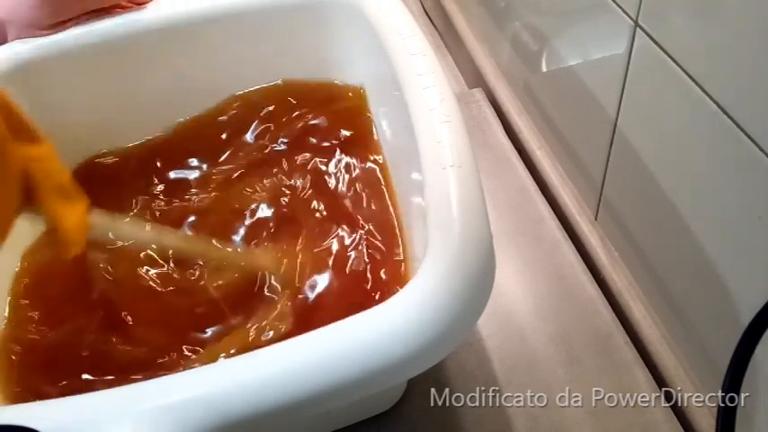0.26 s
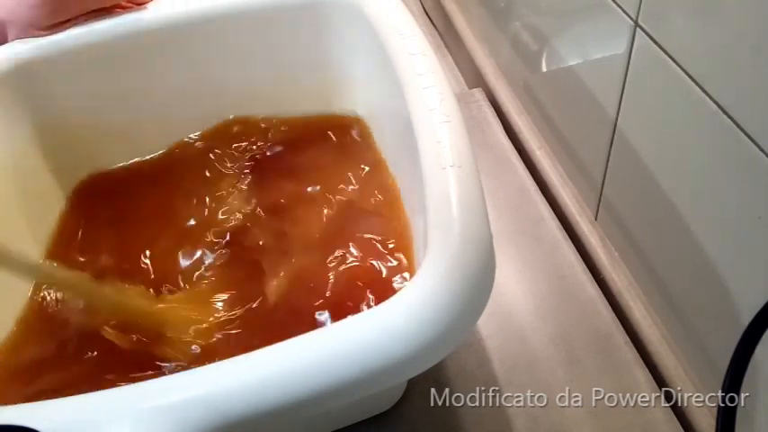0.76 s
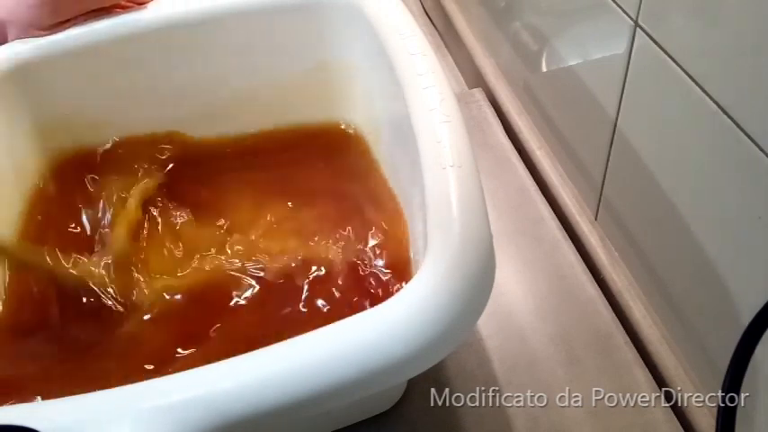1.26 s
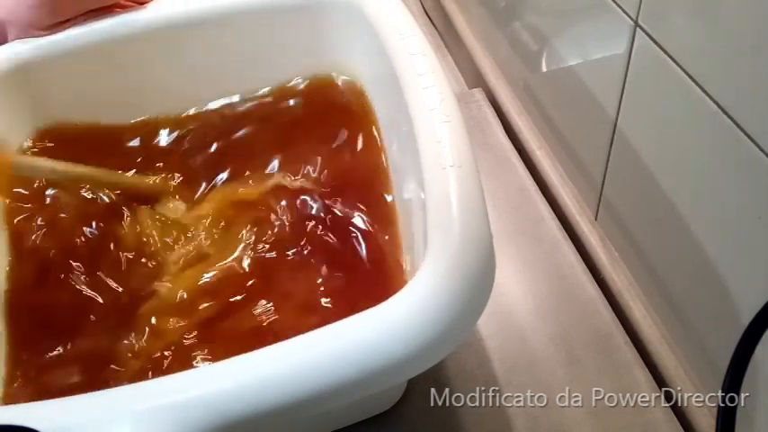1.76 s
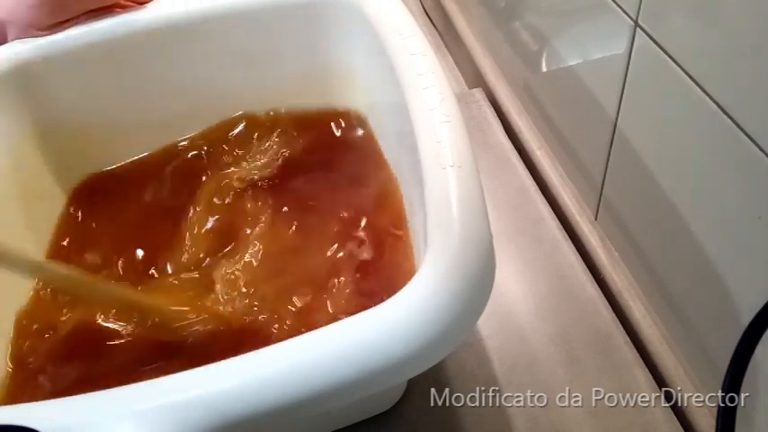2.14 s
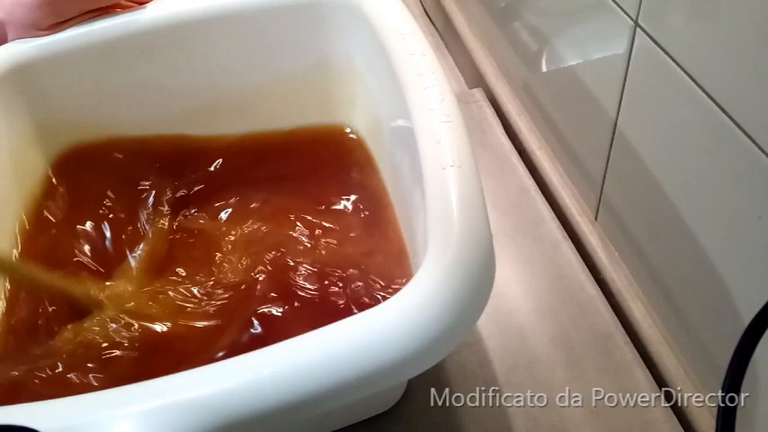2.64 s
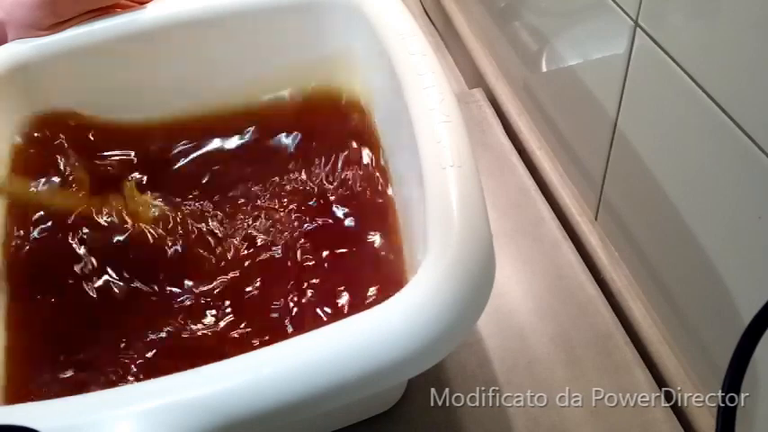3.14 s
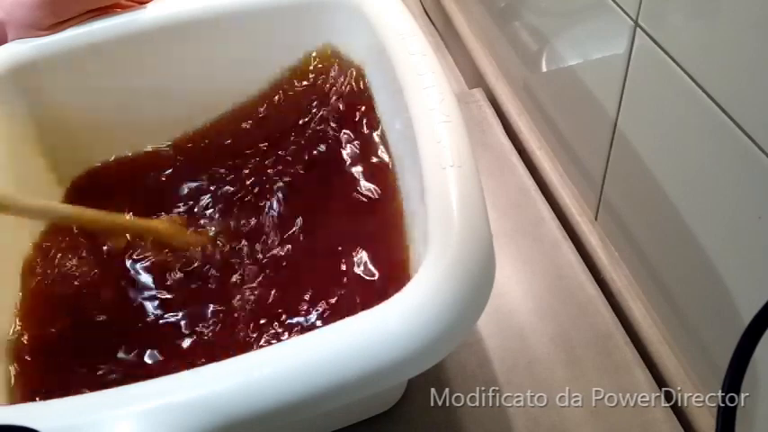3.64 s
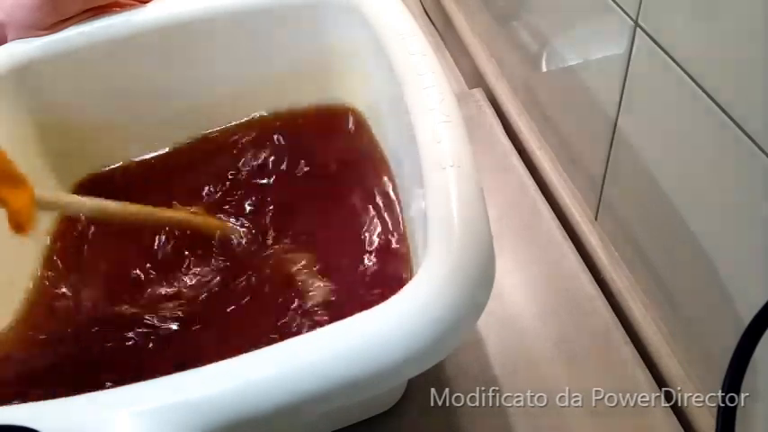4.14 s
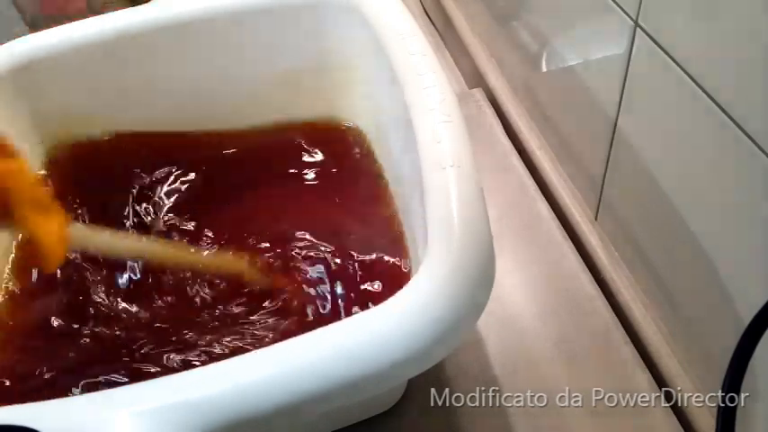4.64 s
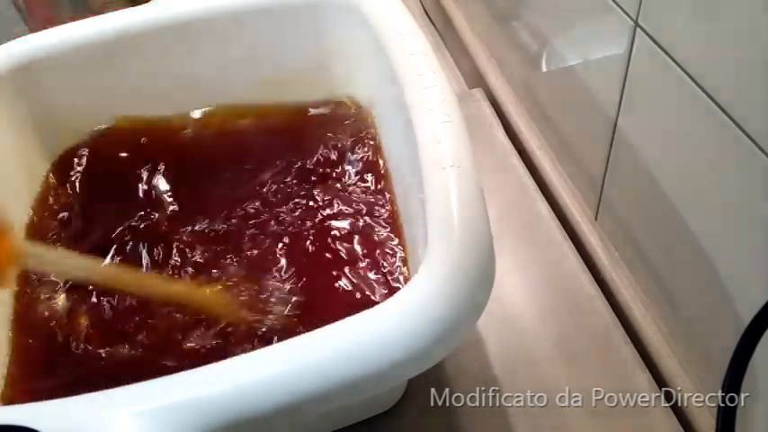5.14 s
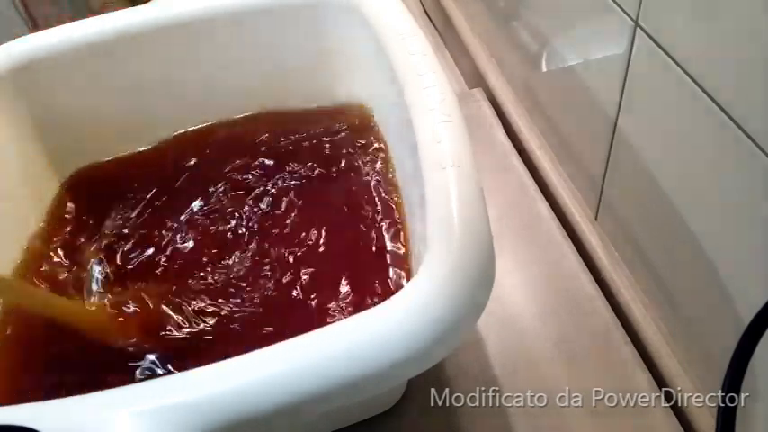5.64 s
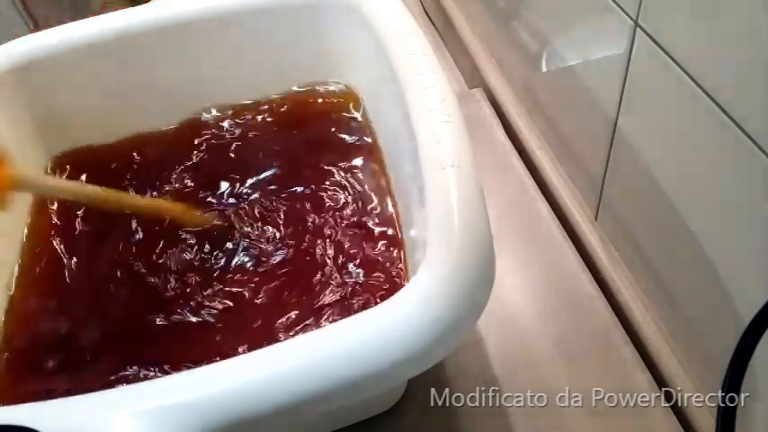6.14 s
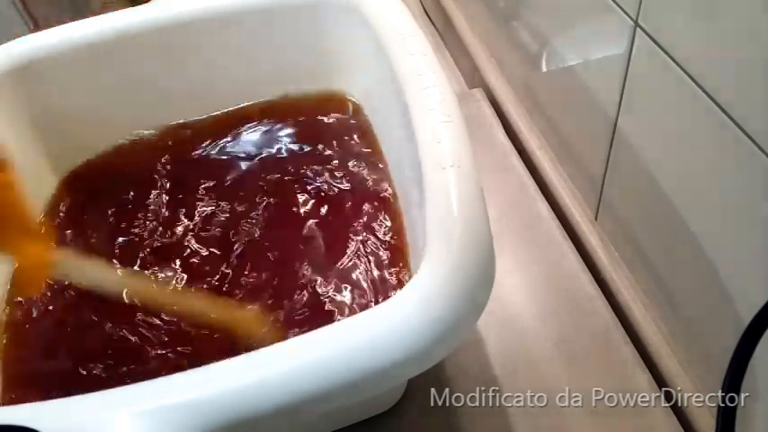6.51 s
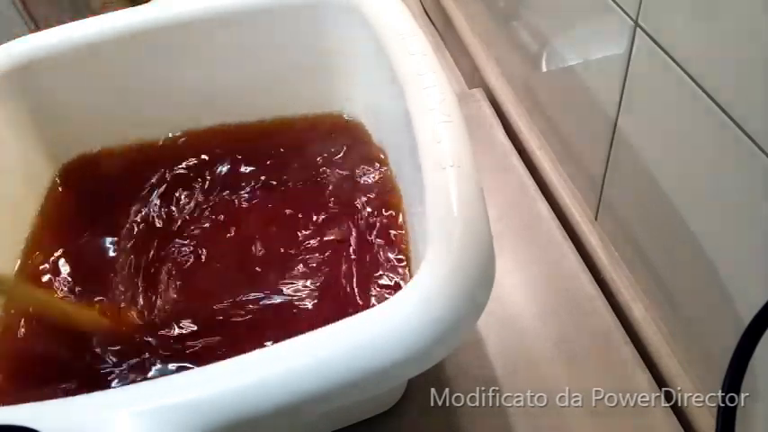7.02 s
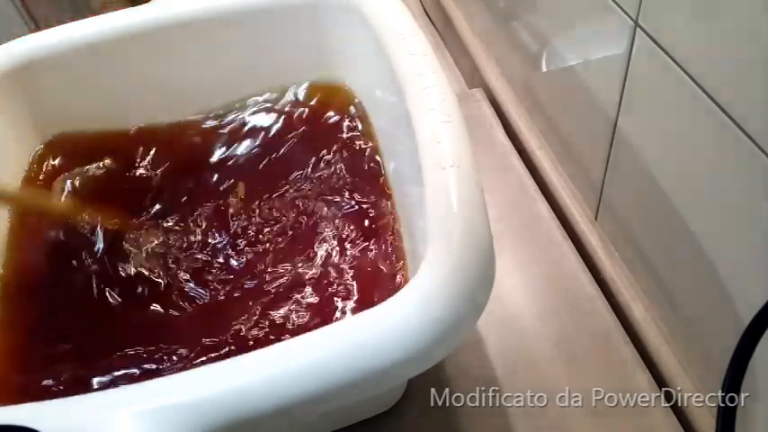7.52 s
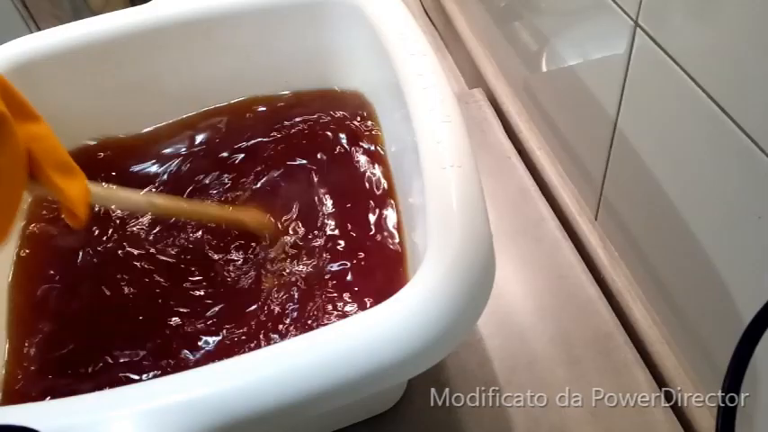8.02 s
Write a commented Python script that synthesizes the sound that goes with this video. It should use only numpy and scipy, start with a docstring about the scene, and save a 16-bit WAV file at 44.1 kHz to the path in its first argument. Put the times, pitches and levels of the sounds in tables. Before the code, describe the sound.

Close, wet stirring in a plastic tub: bubbling swirls, bright droplet ticks and fizzing froth pulse continuously with a short hollow room echo.

```python
"""A wooden spoon stirs thin liquid soap round a plastic basin in a small tiled room.
Each stroke folds air under: trapped bubbles ring as resonators, many gliding upward near the surface.
Swarms of smaller bubbles make gurgle, fizz and froth; crests and sheets spatter as filtered noise.
Liquid heaves and hums in the basin; drifting echoes and a decaying tail give basin and room."""
import sys
import numpy as np
from scipy import signal
from scipy.fft import rfft, irfft
from scipy.io import wavfile
from scipy.ndimage import map_coordinates

SR = 44100
rng = np.random.default_rng(int(sys.argv[2]) if len(sys.argv) > 2 else 0)


def file_out(sig):
    """Save sig as 16-bit WAV at sys.argv[1]."""
    # one column per channel
    cols = np.atleast_2d(sig).T
    # limit, then scale
    lim = np.clip(cols, -1, 1)
    pcm = np.round(lim * 32767).astype(np.int16)
    wavfile.write(sys.argv[1], SR, pcm)


N = 364266  # length [samples]

# Spectrum of froth and bursting films: (frequency [Hz], filter gain [dB])
FROTH_SPECTRUM = [(200, -61), (900, -42), (2200, -4), (3800, 6.5), (6000, 3), (9000, -3), (15000, -4)]
# Spectrum of the churning wake: (frequency [Hz], filter gain [dB])
GURGLE_SPECTRUM = [(90, -13), (300, -20.5), (450, -10), (750, -3.5), (1000, 1.5), (1350, 6.5), (2500, 3.5),
                   (4000, -4.5), (6000, -4.5)]
# Air resonances of the basin: (frequency [Hz], width [Hz], relative gain [dB])
BASIN_MODES = [(447, 35, 3), (508, 36, 14.5), (597, 130, -10.5), (1340, 71, 1), (1850, 49, 0),
               (2530, 180, -14.5)]
# Growth of each wavelet: (build rate [dB/s], level between wavelets [dB])
GURGLE_GROWTH = (330, -72)
FROTH_GROWTH = (330, -86)
PLIP_CYCLES = 10  # life of a steady bubble, in cycles of its pitch


def gain_of(db):
    """Amplitude ratio: 20 dB is a factor of ten."""
    return 10 ** (np.asarray(db) / 20)


def evened(x):
    """Normalization: scales a signal to an rms of one."""
    return x / np.sqrt(np.mean(x ** 2) + 1e-20)


def read_spectrum(points, hz):
    """Linear interpolation on a logarithmic frequency axis."""
    f, value = np.transpose(points)
    return np.interp(np.log(hz + 1), np.log(f), value)


def add(mix, s, sound):
    """Superposition: adds a sound to the mix from time s [s]."""
    part = mix[max(round(s * SR), 0):][:len(sound)]
    part += sound[:len(part)]


def colour(x, points, tilt_db=0, size=2048):
    """Minimum-phase filtering: phase follows from log gain, so clicks keep their sharp front."""
    hz = np.fft.rfftfreq(size, 1 / SR)
    gain_db = read_spectrum(points, hz) + tilt_db * np.log2(hz + 1000)
    log_gain = np.log(gain_of(gain_db))
    both_sides = np.r_[log_gain, log_gain[-2:0:-1]]
    response = np.exp(signal.hilbert(both_sides).conj())
    return signal.oaconvolve(x, np.fft.ifft(response).real)[:len(x)]


def waver(length, hz):
    """Band-limited random motion: splined noise of about unit size, changing about hz times a second."""
    at = np.arange(length) * hz / SR
    return map_coordinates(rng.standard_normal(int(at[-1]) + 4), [at + 1], order=3)


def impacts(per_s, spread_db, cap=10.95):
    """Random impulse train: independent arrivals whose sizes in dB are exponentially spread."""
    size = gain_of(spread_db * np.minimum(rng.exponential(1, N), cap))
    return size * rng.choice([-1, 1], N) * (rng.random(N) < per_s / SR)


def bubble(hz, life, rise, onset=0.05, wobble=0, wobble_hz=1):
    """Bubble resonance: trapped air rings, its pitch climbing as the liquid above it thins."""
    t = np.arange(0, 2 * life, 1 / SR)
    # a squeezed bubble rings unevenly, in level and in pitch
    shape, bend = [wobble * waver(len(t), wobble_hz) if wobble else 0 for _ in range(2)]
    octaves = rise * np.minimum(t, 1.2 * life) + bend / 10
    phase = 2 * np.pi * np.cumsum(hz * 2 ** octaves) / SR
    build = 1 - np.exp(-t / (onset * life))
    # slow decay, then a quick end as the bubble bursts
    decay = np.exp(-t / life / 2 - (t / life / 1.2) ** 4)
    return build * decay * (1 + shape) * np.sin(phase)


def stirring(order, growth):
    """Energy summation: wavelets build and settle exponentially, and their powers add."""
    # Wavelets raised by the spoon and thrown back by the walls:
    # (time of crest [s], gurgle drive [dB], froth drive [dB])
    wavelets = np.array([(0.035, -43, -51), (0.24, -54, -58), (0.41, -54, -56), (0.59, -54, -51),
                         (0.77, -53, -56), (1.12, -50, -51), (1.261, -45.5, -59), (1.38, -48, -47),
                         (1.56, -49, -53), (1.73, -52, -49), (1.89, -49, -53), (2.14, -51, -55),
                         (2.36, -58, -58.5), (2.68, -47, -54), (3.08, -57, -57), (3.22, -50, -56),
                         (3.29, -51, -56), (3.49, -52, -60), (3.61, -50, -48), (3.78, -45, -48),
                         (3.94, -52, -55), (4.26, -48, -47), (4.38, -43, -45), (4.55, -48, -48),
                         (4.68, -47, -53), (4.82, -50, -45), (5.0, -44.5, -51), (5.11, -43, -44),
                         (5.38, -49, -51), (5.58, -47, -52), (5.7, -45, -53), (5.86, -52, -57.5),
                         (6.34, -49, -59), (6.47, -51, -57), (6.72, -59, -60), (6.92, -44, -49),
                         (7.15, -48, -55), (7.36, -51, -49), (7.61, -45, -50), (7.72, -51, -56),
                         (8.09, -56, -52), (8.19, -51, -52)])
    build, calm_db = growth
    settle_s = 0.26  # time to settle by 20 dB
    t = np.arange(0, N, 64) / SR
    age = t[:, None] - wavelets[:, 0]
    level_db = wavelets[:, order] + np.minimum(build * age, -20 * age / settle_s)
    power = (gain_of(level_db) ** 2).sum(1) + gain_of(calm_db) ** 2
    return np.interp(np.arange(N) / SR, t, np.sqrt(power))


def swarm(drive, low_hz, high_hz, cycles, per_s, octaves, spread_db=7.5):
    """Random superposition of bubble resonances: harder stirring makes them more frequent and louder."""
    crowd = (drive / drive.mean()) ** .8
    births = np.flatnonzero(rng.random(N) < crowd * per_s / SR)
    out = np.zeros(N)
    for at, (pitch, length, glide, size) in zip(births, rng.random((len(births), 4))):
        hz = low_hz * (high_hz / low_hz) ** pitch
        life = cycles / hz * (.5 + length)
        ring = bubble(hz, life, octaves * glide ** 2 / life)
        size_db = spread_db * min(-np.log(1 - size), 3)
        balance = np.sqrt(hz / len(ring) / crowd[at])
        add(out, at / SR, gain_of(size_db) * ring * balance * drive[at])
    return out / np.sqrt(np.mean((out / drive) ** 2))


def plops(db=-0.36, snap_db=-15.5, snap_share=0.17, film_db=-24.0, shed_db=-13.5, shed_octaves=0.916):
    """Bubble resonance of larger bubbles: each snaps as its neck closes and sheds three weaker ones."""
    # Bubbles that glide upward as they near the surface:
    # (time [s], relative level [dB], starting pitch [Hz], rise [octaves/s], life [s])
    gliding = [(0.03, -26, 1116, 7.9, 0.0055), (0.186, -30, 958, 45, 0.015),
               (0.196, -26.5, 1337, 59, 0.012), (0.428, -26.5, 2630, 81, 0.0038),
               (0.491, -18.5, 2130, 62, 0.0068), (0.727, -30, 1145, 21.3, 0.0112),
               (1.092, -29, 2920, 27, 0.0036), (1.225, -38.5, 400, 13, 0.023),
               (1.25, -32.5, 454, 33, 0.023), (1.369, -28.5, 587, 28.5, 0.022),
               (1.514, -24.5, 1361, 19, 0.0045), (1.52, -32, 1570, 77, 0.013),
               (1.556, -26, 3380, 24, 0.0058), (2.159, -32, 1383, 16, 0.011), (2.168, -31, 1645, 46, 0.012),
               (2.605, -42, 440, 13.4, 0.021), (2.751, -31.5, 2000, 30, 0.0092),
               (3.206, -44, 455, 15.5, 0.018), (3.222, -43, 796, 50, 0.015), (3.24, -30, 1510, 100, 0.0034),
               (3.28, -32, 1470, 53, 0.01), (3.478, -27.5, 1670, 34, 0.008), (3.762, -34, 582, 28, 0.027),
               (4.168, -38, 1160, 27, 0.011), (4.191, -33, 1616, 10, 0.035),
               (4.26, -32.5, 1153, 17.4, 0.017), (4.33, -30, 850, 110, 0.0054),
               (4.657, -30.5, 1220, 9.8, 0.0048), (4.856, -43, 413, 41, 0.014),
               (5.115, -20.5, 1290, 27, 0.0089), (6.375, -42.5, 587, 39, 0.025),
               (6.389, -29.5, 1134, 53, 0.0045), (6.868, -27, 561, 59, 0.015),
               (6.868, -23, 1390, 44, 0.0027), (6.872, -15, 1760, 32, 0.003),
               (6.876, -24, 2330, 38, 0.0037), (7.221, -35.5, 1096, 58, 0.0081),
               (7.594, -21, 2590, 9.7, 0.0038)]
    # Bubbles at a nearly steady pitch: (time [s], relative level [dB], pitch [Hz])
    plinks = [(0.0038, -28, 1294), (0.0474, -31, 3612), (0.051, -24.5, 1330), (0.542, -27, 2800),
              (0.544, -36.5, 1375), (0.629, -25.5, 2440), (0.765, -35.5, 2420), (0.844, -38, 1520),
              (0.847, -31, 2336), (0.8753, -38.5, 2770), (0.9173, -44, 1167), (0.9733, -45.5, 1425),
              (1.0768, -35.5, 2460), (1.1052, -37, 1360), (1.1246, -27, 2664), (1.127, -24.0, 3470),
              (1.2065, -32.5, 2940), (1.229, -33, 2500), (1.275, -35, 1300), (1.421, -31, 1442),
              (1.5978, -33, 2600), (1.6567, -35, 3330), (1.727, -30, 2370), (1.8075, -35.5, 2930),
              (1.8418, -40.2, 1415), (1.903, -33, 1290), (1.913, -26, 2449), (1.9668, -34.5, 3310),
              (2.2172, -34.5, 2170), (2.337, -36.5, 4800), (2.356, -36, 2890), (2.3782, -37.2, 2290),
              (2.683, -26.5, 1073), (2.9107, -47, 2465), (3.067, -34.5, 3550), (3.1295, -37.8, 4230),
              (3.2006, -35.2, 2640), (3.4056, -40, 4170), (3.4324, -30.5, 3170), (3.56, -41.0, 3526),
              (3.607, -31.5, 1350), (3.638, -22, 2550), (3.652, -34, 1090), (3.691, -31, 1940),
              (3.749, -21.5, 1870), (3.826, -32, 3400), (3.86, -33, 1112), (3.933, -37, 917),
              (4.085, -35.5, 1460), (4.1084, -38, 3450), (4.1632, -30.5, 3780), (4.2289, -27.5, 4870),
              (4.271, -22, 3832), (4.3113, -24.5, 3860), (4.329, -29, 1960), (4.3453, -31.1, 2950),
              (4.346, -32, 749), (4.367, -29.5, 725), (4.3686, -26, 2930), (4.38, -29.5, 1303),
              (4.38, -28, 1870), (4.4826, -32, 3262), (4.6124, -33, 2100), (4.807, -35.5, 2060),
              (4.876, -39, 770), (4.977, -26.5, 634), (5.0697, -34, 1067), (5.106, -25.5, 2480),
              (5.161, -39, 867), (5.231, -29.5, 1964), (5.2317, -34, 3224), (5.375, -29, 2440),
              (5.374, -27, 1880), (5.566, -22.5, 1930), (5.627, -39.2, 593), (5.88, -32, 1323),
              (5.936, -33.5, 1980), (5.956, -32.5, 3980), (6.195, -40.5, 3570), (6.314, -37, 3530),
              (6.484, -34, 1610), (6.564, -30.5, 3550), (6.81, -38, 1884), (6.874, -25, 1437),
              (6.9088, -31, 1900), (6.939, -33, 2210), (7.0042, -45, 2860), (7.364, -29, 1435),
              (7.4748, -32.5, 2600), (7.4782, -40, 1383), (7.625, -25.5, 2420), (7.639, -30.5, 1840),
              (7.676, -39.5, 789.4), (7.943, -43, 1120), (7.97, -28.5, 3470), (8.0333, -39, 1309),
              (8.15, -30.5, 913)]
    steady = [(s, size_db, hz, 0, PLIP_CYCLES / hz) for s, size_db, hz in plinks]
    out, snaps = np.zeros(N), np.zeros(N)
    t = np.arange(SR // 20) / SR
    for s, size_db, hz, rise, life in gliding + steady:
        ring = bubble(hz, life, rise, onset=.08, wobble=.27, wobble_hz=hz / 4)
        add(out, s, gain_of(size_db + db) * ring)
        snap = rng.standard_normal(len(t)) * np.exp(-t / (snap_share * life))
        add(snaps, s, gain_of(size_db + snap_db) * snap)
        for late, smaller in rng.random((3, 2)):
            shed = bubble(hz * 2 ** (shed_octaves * smaller), life / 2, rise / 2)
            add(out, s + life * (.5 + 2 * late), gain_of(size_db + shed_db) * shed)
    # so small a source sends out little bass
    out = signal.sosfilt(signal.butter(2, 240, "high", fs=SR, output="sos"), out)
    return out + colour(snaps, GURGLE_SPECTRUM) + gain_of(film_db) * colour(snaps, FROTH_SPECTRUM)


def gurgle(db=-1.5):
    """Collective bubble resonance: small bubbles churn in the wake of the spoon."""
    drive = stirring(order=1, growth=GURGLE_GROWTH)
    wake = swarm(drive, 270, 4400, cycles=9, per_s=600, octaves=.35, spread_db=4.5)
    return gain_of(db) * colour(wake, GURGLE_SPECTRUM)


def fizz(db=-6.5):
    """Dense superposition: tiny bubble resonances overlap into a wet fizz behind each wavelet."""
    # Spectrum of the mass of tiny bubbles: (frequency [Hz], filter gain [dB])
    fizz_spectrum = [(300, -29), (1400, -3.5), (3000, -2), (9000, -27), (16000, -21)]
    gurgle_drive = stirring(order=1, growth=GURGLE_GROWTH)
    froth_drive = stirring(order=2, growth=FROTH_GROWTH)
    drive = np.sqrt(gurgle_drive * froth_drive)
    mass = swarm(drive, 1200, 7000, cycles=7, per_s=1400, octaves=.25, spread_db=3.5)
    return gain_of(db) * colour(mass, fizz_spectrum)


def froth(db=-1.0, ticks_db=-5.5, hiss_db=-47.0):
    """Resonance and impulsive noise: tiny bubbles ping and films burst in clumps, over a thin swish."""
    drive = stirring(order=2, growth=FROTH_GROWTH)
    pings = swarm(drive, 2500, 15000, cycles=6, per_s=380, octaves=.15)
    ticks = gain_of(ticks_db) * evened(impacts(per_s=700, spread_db=4.5))
    swish = gain_of(hiss_db) * rng.standard_normal(N)
    clumps = gain_of(5.5 * np.minimum(waver(N, 130), 1.7))
    return gain_of(db) * colour(pings + drive * clumps * (ticks + swish), FROTH_SPECTRUM)


def heave(db=-11.5, life=0.015, spread_s=0.07, slosh_db=-32.5):
    """Damped oscillation: dull pushes of liquid on plastic, and a low slosh that follows the stirring."""
    # Heaves against the basin: (time [s], relative peak [dB], central pitch [Hz])
    heaves = [(1.234, -43, 335), (3.06, -50, 155), (4.23, -47, 310), (4.33, -37.5, 483),
              (4.544, -46.5, 166), (5.65, -51.5, 516), (6.5, -50.5, 300)]
    # Spectrum of the slosh: (frequency [Hz], filter gain [dB])
    slosh_spectrum = [(30, -17), (75, -17), (98, -4), (170, 1), (280, 6), (380, -20), (500, 9), (700, 11),
                      (1500, -14)]
    pushes = np.zeros(N)
    for s, peak_db, hz in heaves:
        for late, detune in rng.random((6, 2)):
            push = bubble(hz * 2 ** (detune - .5), life, 0, onset=.3, wobble=.5, wobble_hz=150)
            add(pushes, s + late * spread_s, gain_of(peak_db + db) * push)
    slosh = evened(colour(impacts(per_s=200, spread_db=2.), slosh_spectrum))
    pushes = signal.sosfilt(signal.butter(3, 130, "high", fs=SR, output="sos"), pushes)
    return pushes + gain_of(slosh_db) * stirring(order=1, growth=GURGLE_GROWTH) * slosh


def pops(db=22.0, decay_s=0.0028, tilt_spread_db=9.5):
    """Impulsive release: a single film tears with a very short crackle, some duller, some brighter."""
    # Bursting films: (time [s], relative level [dB])
    films = [(0.075, -38), (0.25, -40), (0.413, -41), (0.782, -41.5), (1.146, -38.5), (1.375, -35),
             (1.671, -38.5), (1.756, -37.5), (2.432, -43.5), (2.994, -45.5), (3.652, -36.5), (3.815, -45),
             (3.841, -41), (4.483, -37.5), (4.53, -41.5), (4.728, -40.5), (4.824, -57), (5.581, -47),
             (5.872, -42.0), (7.344, -39.5), (7.416, -41), (8.171, -43.5)]
    out, t = np.zeros(N), np.arange(SR // 50) / SR
    for s, level_db in films:
        crackle = rng.standard_normal(len(t)) * np.exp(-t / decay_s)
        tick = colour(crackle, FROTH_SPECTRUM, tilt_spread_db * rng.uniform(-0.37, 1))
        add(out, s, gain_of(level_db + db) * tick / np.linalg.norm(tick))
    return out


def spatter(db=22.0, drops_per_s=6000):
    """Impact noise: a crest slaps down as a spray of droplets that builds within a millisecond or two."""
    # Breaking crests: (time [s], relative strength [dB], treble tilt [dB/octave])
    crests = [(0.3666, -40.5, 10.5), (0.581, -27.5, 6.5), (1.0135, -46, 1.5), (1.084, -33, 0.5),
              (1.1247, -39, 13), (1.3543, -30, 25), (1.9047, -31, 13.5), (2.252, -38, -2.5),
              (3.431, -44, -5), (2.612, -28, 14.5), (2.835, -45.5, 6.5), (3.185, -41, 8.5),
              (3.4725, -39, 1), (3.754, -32, 10), (3.8645, -36, 8.5), (4.028, -39.5, 12), (4.381, -35.5, 6),
              (5.5601, -38.5, 6.5), (5.653, -35.5, -0.5), (5.779, -31, 1), (6.485, -37, -4),
              (6.7176, -38.5, 10), (7.117, -42.5, 22), (7.2771, -42, 4.5), (7.4498, -29, 4.5),
              (8.149, -38.5, 5.5)]
    # Spectrum of the spray: (frequency [Hz], filter gain [dB])
    spray_spectrum = [(120, -58), (500, -48), (1800, 14), (3900, 18), (7000, 8.5), (11000, -1),
                      (16000, -15.5)]
    out, t = np.zeros(N), np.arange(SR // 10) / SR
    envelope = (1 - np.exp(-t / .0008)) * np.exp(-t / .005)
    for s, peak_db, tilt_db in crests:
        drops = rng.standard_normal(len(t)) * (rng.random(len(t)) < drops_per_s / SR)
        burst = colour(drops * envelope, spray_spectrum, tilt_db)
        add(out, s, gain_of(peak_db + db) * burst / np.linalg.norm(burst))
    return out


def rubs(width_hz=55):
    """Driven resonance: the dragging spoon keeps the strongest air resonance humming roughly."""
    # Drags along the bottom: (time [s], length [s], rms level [dB])
    drags = [(3.06, 0.24, -61.5), (7.2, 0.2, -74)]
    out = np.zeros(N)
    for s, length, level_db in drags:
        t = np.arange(0, length, 1 / SR)
        roughness = waver(len(t), width_hz) + 1j * waver(len(t), width_hz)
        hum = roughness * np.exp(2j * np.pi * BASIN_MODES[1][0] * t)
        add(out, s, gain_of(level_db) * evened(hum.real * np.sin(np.pi * t / length)))
    return out


def splashes(release_s=0.0079, spray_db=-2.5, count=70):
    """Bubble resonance and spray noise: a breaking sheet of liquid swells, then collapses."""
    # Sheets that run up the wall and break:
    # (time [s], length [s], level at the end [dB], swell [dB])
    sheets = [(4.183, 0.096, -37.5, 6)]
    # Spectrum of a sheet: (frequency [Hz], filter gain [dB])
    sheet_spectrum = [(200, -29), (600, -6), (2500, -8), (4200, 2), (6500, -1), (16000, -15)]
    out = np.zeros(N)
    for s, length, db, swell_db in sheets:
        t = np.arange(0, 2 * length, 1 / SR)
        cluster = np.zeros(len(t))
        for late, pitch in rng.random((count, 2)):
            hz = 1400 * 6 ** pitch
            add(cluster, late * length, bubble(hz, PLIP_CYCLES / hz, hz / PLIP_CYCLES / 10))
        spray = gain_of(spray_db) * colour(rng.standard_normal(len(t)), sheet_spectrum)
        body = evened(colour(cluster, sheet_spectrum) + spray)
        swell = gain_of(db + swell_db * np.minimum(t / length - 1, 0))
        collapse = np.exp(-np.maximum(t - length, 0) / release_s)
        add(out, s, swell * collapse * body)
    return out


def basin(x, db=-5.5, ring_s=0.0058):
    """Early reflection: near walls return a quick flurry of echoes, which shifts as the liquid moves."""
    t, out = np.arange(SR // 20) / SR, np.zeros(N)
    for k in range(3):
        arrivals = rng.random(len(t)) < 2000 / SR
        taps = rng.standard_normal(len(t)) * arrivals * np.exp(-t / ring_s)
        share = np.cos(np.pi * (np.arange(N) / SR + k / 3))
        out += signal.oaconvolve(x * share, taps / np.linalg.norm(taps))[:N]
    return x + gain_of(db) * out


def room(x, db=-13.0, gap_s=0.0094):
    """Reverberation: a hollow-coloured tail rings on, its echoes shifting as the spoon goes round."""
    # Ring of the tiled room: (frequency [Hz], time to decay by 60 dB [s])
    decay_times = [(300, 0.22), (800, 0.54), (2100, 0.48), (5500, 0.62), (14000, 0.4)]
    out = np.zeros(N)
    for k in range(3):
        hz, t, z = signal.stft(rng.standard_normal(SR // 2), SR, nperseg=256)
        decay = gain_of(-60 * t / read_spectrum(decay_times, hz)[:, None])
        tail = signal.istft(z * decay, SR)[1]
        # the tail fades in over the gap after the direct sound
        tail = tail * np.minimum(np.arange(len(tail)) / SR / gap_s, 1) ** 2
        hz = np.fft.rfftfreq(len(tail), 1 / SR)
        hollow = 1 + sum(gain_of(d) / (1 + 2j * (hz - f) / width) for f, width, d in BASIN_MODES)
        echoes = irfft(rfft(tail / np.linalg.norm(tail)) * hollow)
        share = np.cos(np.pi * (1.5 * np.arange(N) / SR + k / 3))
        out += signal.oaconvolve(x * share, echoes)[:N]
    return gain_of(db) * out


def scene(quiet_db=-67.0):
    """Linear superposition: the stirred liquid in its basin, in a quiet room."""
    # Spectrum of the quiet background: (frequency [Hz], filter gain [dB])
    quiet_spectrum = [(25, -33), (100, -4.5), (500, 2), (1500, -6.5), (5000, -7), (16000, -10.5)]
    liquid = plops() + gurgle() + fizz() + froth() + heave()
    liquid += pops() + spatter() + rubs() + splashes()
    quiet = gain_of(quiet_db) * evened(colour(rng.standard_normal(N), quiet_spectrum))
    return (basin(liquid) + room(liquid) + quiet)[None]


def record(dry):
    """Band limitation: a linear-phase low-pass removes the highest treble."""
    edge_hz = 16200
    low_pass = signal.firwin(511, edge_hz, window=("kaiser", 9), fs=SR)
    return signal.oaconvolve(dry, low_pass[None], "same")


dry = scene()
out = record(dry)
file_out(out)
```